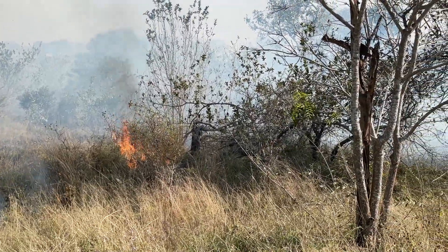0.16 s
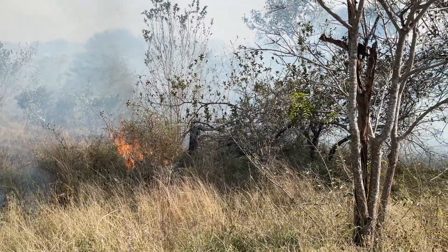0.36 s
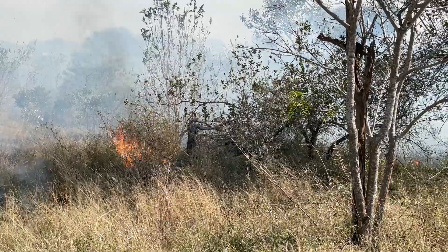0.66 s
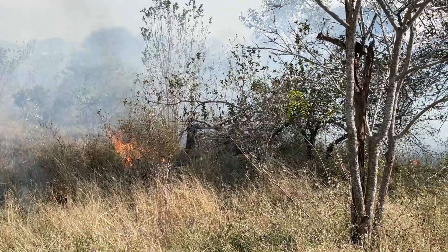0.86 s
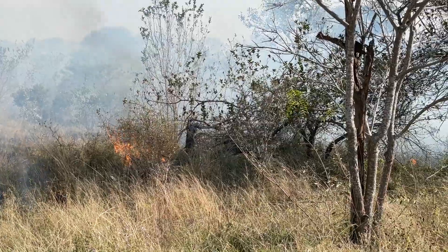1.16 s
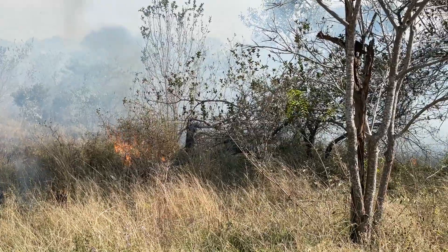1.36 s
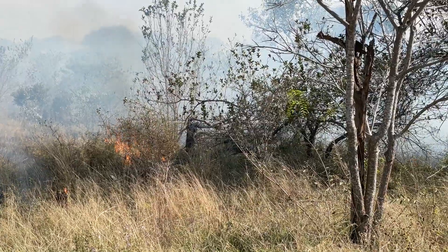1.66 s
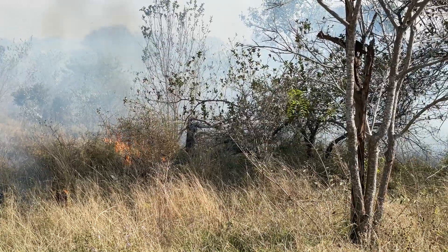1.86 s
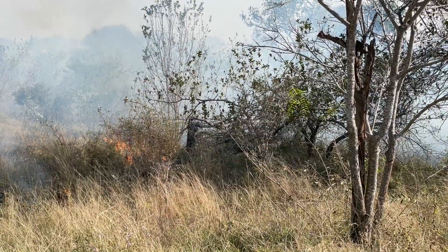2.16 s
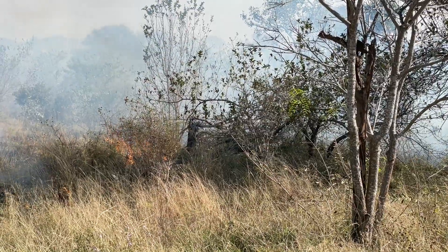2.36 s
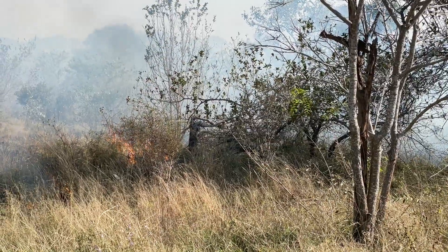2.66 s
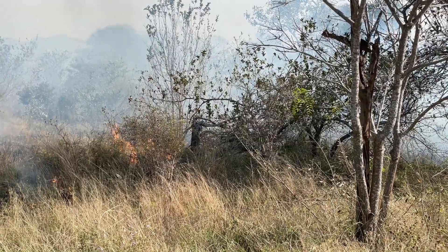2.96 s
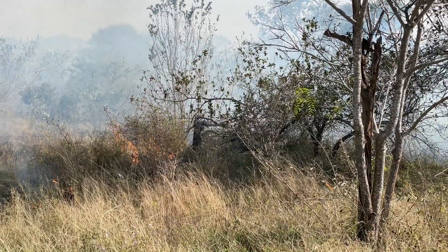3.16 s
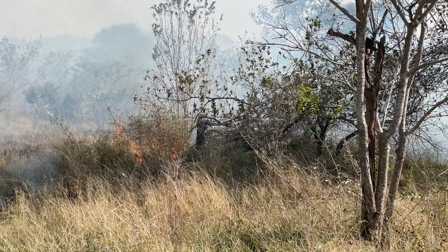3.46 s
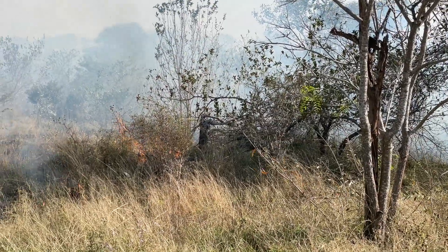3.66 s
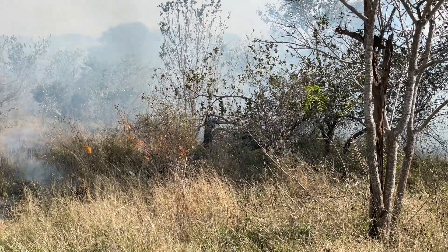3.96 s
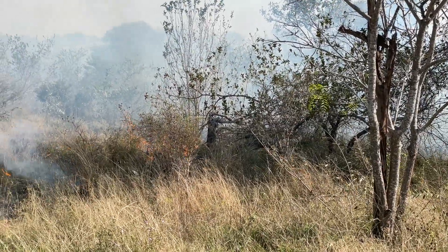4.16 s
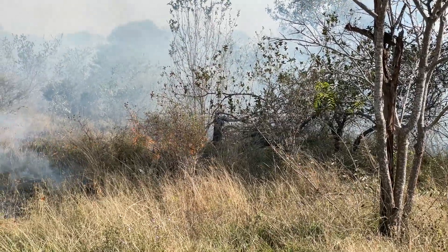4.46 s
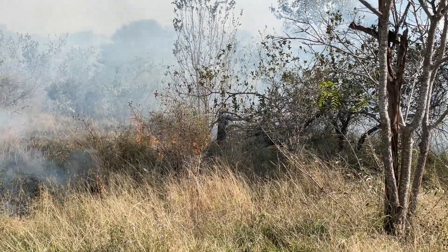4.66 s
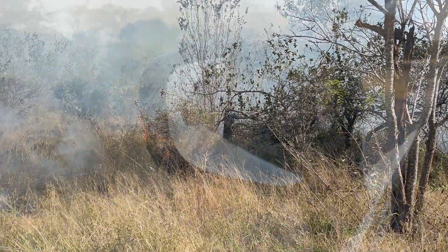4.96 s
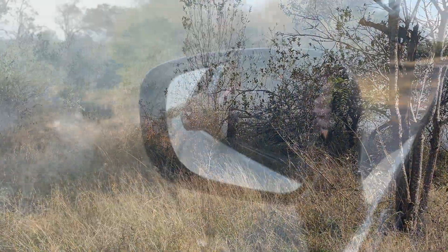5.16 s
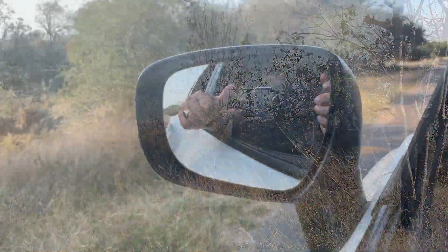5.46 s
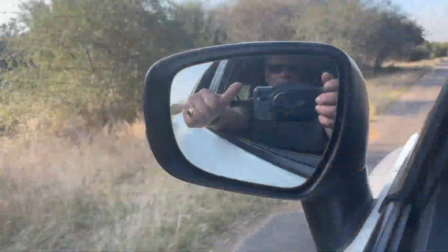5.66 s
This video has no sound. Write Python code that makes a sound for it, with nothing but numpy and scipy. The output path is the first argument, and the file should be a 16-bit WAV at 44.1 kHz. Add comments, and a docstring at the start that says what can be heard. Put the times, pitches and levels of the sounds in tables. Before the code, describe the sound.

A brush fire spits dense crisp pops and fine fizz, one thick limb cracks, then moving-car wind thuds take over as the fire dies away.

```python
"""Dry grass and shrubs burn in the open: from the start, stems snap one by one (shaped noise clicks) over a fizz of
smaller crackles (random trains of such clicks over hiss) and a low roar (filtered noise).
Now and then a pocket of steam bursts with a thump (falling, decaying sine); at 2.6 s a thick limb splits (run of snaps).
From 5.1 s the fire fades and the wind of a moving car buffets the microphone: growing low noise, dull noise puffs
and, last, one click."""
import sys
import numpy as np
from scipy import signal
from scipy.fft import rfft, irfft
from scipy.io import wavfile
from scipy.ndimage import uniform_filter1d

SR = 44100
rng = np.random.default_rng(int(sys.argv[2]) if len(sys.argv) > 2 else 0)


def generate_wav(signal):
    """Clip the signal to [-1, 1] and save it as 16-bit WAV at the path in sys.argv[1]."""
    frames = np.transpose(np.atleast_2d(signal))
    scaled = np.clip(frames, -1, 1) * 32767
    pcm = np.round(scaled).astype(np.int16)
    wavfile.write(sys.argv[1], SR, pcm)


N = 255780

# loudest snapping stems: (time [s], ring level [dB], ring frequency [Hz], knock level [dB], fizz level [dB]);
# each level is the rms if the part's energy filled 1 ms
SNAPS = [(0.0054, -34.5, 4900, -46, -38), (0.0923, -19, 5000, -43, -28.5), (0.1638, -44, 2300, -34, -52),
         (0.3142, -44, 2400, -35.5, -57), (0.3183, -24, 5070, -50, -50), (0.3673, -28, 4900, -35.5, -35),
         (0.3715, -36, 5200, -49, -35), (0.4272, -31.5, 3870, -38.5, -28), (0.476, -37, 3900, -43.5, -48),
         (0.4859, -24, 5460, -38.5, -40), (0.5194, -19, 4860, -43, -41), (0.62, -28.5, 4000, -35, -44),
         (0.6675, -17.5, 4700, -35.5, -18.5), (0.7198, -28, 4500, -46, -33), (0.748, -24, 6200, -51, -31),
         (0.895, -31, 5300, -41.5, -49), (0.9363, -35, 3100, -35.5, -48), (1.007, -20, 4500, -33.5, -24.5),
         (1.0428, -32, 4000, -45, -38), (1.0703, -22, 4950, -36, -31.5), (1.1458, -36, 3400, -33.5, -33.5),
         (1.2045, -32, 5500, -60, -32), (1.2896, -35.5, 6000, -49, -26.5), (1.3678, -21.5, 4160, -41, -36),
         (1.439, -27, 5430, -42, -27), (1.4523, -28, 5500, -36, -42), (1.4573, -36, 3300, -39, -42),
         (1.5287, -32, 6100, -61, -29.5), (1.595, -47, 2300, -31, -50), (1.6445, -32, 3800, -42, -34),
         (1.7124, -29, 4900, -53, -33.5), (1.786, -28, 4000, -40, -47), (1.7988, -34, 5100, -54, -44),
         (1.8165, -31, 6000, -52, -39), (1.8321, -26, 4470, -45, -32), (1.8359, -29, 4300, -35, -46),
         (1.8848, -25.5, 5470, -47, -30.5), (2.0278, -22.5, 6260, -48, -22.5),
         (2.0827, -25, 4600, -48, -32), (2.091, -29, 4300, -40, -44), (2.0974, -27, 3700, -35, -36),
         (2.1758, -21.5, 4660, -42, -24.5), (2.1933, -33, 3000, -39.5, -49), (2.3238, -29, 6270, -39, -28),
         (2.401, -31, 4400, -41, -44), (2.4356, -25, 5500, -46, -31), (2.5683, -41, 2500, -41.5, -48),
         (2.5718, -23, 5370, -45.5, -35), (2.61, -29.5, 3700, -29.5, -40.5), (2.6834, -31, 6200, -58, -34),
         (2.7056, -20.5, 5000, -33.5, -37), (2.7482, -30.5, 5140, -36, -32), (3.17, -34, 5200, -48, -31),
         (3.2409, -34, 4800, -38.5, -39), (3.2836, -29.5, 4800, -40, -33), (3.4055, -29, 4020, -34.5, -32),
         (3.4551, -30.5, 4900, -42, -37), (3.4666, -28.5, 5300, -53, -27.5),
         (3.6127, -21.5, 5800, -43, -27), (3.6271, -20, 4960, -47, -38), (3.6318, -17, 5070, -38, -30.5),
         (3.6428, -22.5, 5800, -53, -20.5), (3.6501, -27.5, 6160, -49, -33),
         (3.6622, -22.5, 6300, -54, -37), (3.8303, -31, 4700, -41, -38), (3.8558, -28.5, 4580, -41, -35),
         (3.9422, -31.5, 4400, -49, -36), (4.0104, -32.5, 5200, -43, -32.5),
         (4.0631, -28.5, 3970, -44, -38), (4.3204, -35, 4000, -47, -40), (4.3249, -22, 4500, -32.5, -31),
         (4.3815, -26.5, 5800, -48, -35), (4.5702, -30, 3580, -37, -33), (4.6236, -31.5, 3700, -43, -39),
         (4.6617, -29, 4500, -37, -42), (4.6705, -32, 5400, -55, -37), (4.7431, -28, 5660, -60, -39),
         (4.9146, -34, 3100, -38.5, -38), (4.9577, -32.5, 5160, -48, -39), (5.075, -29.5, 4050, -38, -39),
         (5.3031, -27, 5560, -40, -32)]
# bursting steam pockets: (time [s], initial envelope [dB])
STEAM_BURSTS = [(0.6678, -27.5), (2.591, -35.5), (3.6132, -48), (3.6327, -44), (3.643, -46), (3.6625, -47),
                (3.8297, -46)]
# eddies that hit the microphone: (time [s], peak of the two-port mean [dB])
EDDIES = [(5.13, -43), (5.163, -39.5), (5.2, -36.5), (5.244, -38.5), (5.297, -32), (5.304, -31),
          (5.373, -29.5), (5.407, -33.5), (5.416, -34.5), (5.483, -35), (5.496, -37), (5.522, -34),
          (5.563, -38), (5.597, -29), (5.607, -27.5), (5.621, -34.5), (5.642, -37.5), (5.732, -35.5),
          (5.763, -24.5)]
# strength of the fire before the end fade: (time [s], level [dB])
BLAZE = [(0.0, -48), (0.42, -47.5), (1.73, -49), (1.89, -48), (2.34, -47.5), (2.83, -45.5), (3.02, -49),
         (3.55, -48), (3.79, -49.5), (4.33, -49.5), (4.55, -48.5), (5.0, -51)]
# filter of a snap's woody knock: (frequency [Hz], relative gain [dB])
KNOCK_FILTER = [(120, -42.5), (400, -4.5), (800, -3), (1300, 3.5), (2000, 3.5), (2700, -0.5), (4500, -24)]
# filter of a snap's ring: (frequency [Hz], relative gain [dB])
RING_FILTER = [(700, -27.5), (1400, -22), (2200, -6.5), (3200, -0.5), (5500, -2), (7300, 0.5), (8100, 0),
               (9000, -14), (11000, -49)]
# filter of a snap's fizz: (frequency [Hz], relative gain [dB])
FIZZ_FILTER = [(7500, -48), (9000, -0.5), (10500, 3.5), (12000, 4), (13800, 2.5), (15000, 2),
               (16000, -13.5)]
# filter of the thin blades: (frequency [Hz], relative gain [dB])
GRASS_FILTER = [(900, -21.5), (1800, -6.5), (2600, -6.5), (3400, -1), (5500, 1.5), (7300, 1), (8100, 0.5),
                (8800, -27), (9700, -3.5), (10600, -1), (13500, -1.5), (15000, -1.5), (16000, -39)]
# filter of the thicker twigs: (frequency [Hz], relative gain [dB])
BRUSH_FILTER = [(150, -17.5), (350, -1), (700, -2), (1000, -4.5), (1400, 0), (2000, -1.5), (3000, 0.5),
                (6000, -24)]
# filter of the flames' roar: (frequency [Hz], relative gain [dB])
ROAR_FILTER = [(12, -46), (22, -28), (40, -5.5), (62, 1.5), (90, -2.5), (150, -4), (230, -7), (330, -16),
               (600, -22.5), (1500, -27), (4000, -62)]
# filter of the wind's rumble: (frequency [Hz], relative gain [dB])
WIND_FILTER = [(12, -34), (25, -8), (50, 2), (80, 1.5), (120, -8.5), (190, -12.5), (350, -23.5),
               (800, -37.5), (2000, -48), (5000, -72)]
# filter of the gust's click: (frequency [Hz], relative gain [dB])
FLICK_FILTER = [(300, -15), (900, -1), (2200, -1), (3500, -3), (5200, -21), (9000, -57)]
# the two microphone ports: (frequency [Hz], phase by which the left leads [rad])
PORT_PHASE = [(20, 0.0), (5200, 0.6), (5800, -1.5), (6600, -0.9), (7100, -1.2), (7600, -2.5), (8800, -3.1),
              (10000, -4.0), (11500, -4.9), (13000, -6.0), (14500, -6.3), (16000, -7.0)]

EDGE_HZ = 16350
SHORT_SIZE, LEAD = 2048, 128  # samples in a short event, and before its onset
SHORT_T_S = np.arange(SHORT_SIZE) / SR
T_S = np.arange(N) / SR

ROAR_DB, WIND_DB, WIND_GROWS_DB_PER_S = -54, -40, 8  # WIND_DB holds at WIND_FULL_S
WIND_FROM_S, WIND_FULL_S = 5.09, 5.21
FADE_FROM_S, FADE_END_S, FADE_POWER = 5.08, 5.752, 2.57
# a harder eddy is quicker than a typical one
EDDY_DB, EDDY_RISE_S, EDDY_EDGE_HZ = -34.5, 0.0027, 847
QUICKER_OCTAVES_PER_DB = 0.07
# lesser stems: the thicker, the lower the ring, the more knock, the less fizz; spreads are standard deviations
STEMS_PER_S, STEM_HZ, STEM_SPREAD_OCTAVES = 30, 4800, 0.37
STEM_OVER_BLAZE_DB, STEM_SPREAD_DB = 11.5, 2.02
KNOCK_OVER_RING_DB, KNOCK_DB_PER_OCTAVE = -13, -17
FIZZ_OVER_RING_DB, FIZZ_DB_PER_OCTAVE = -7.5, 10
BURST_HZ, BURST_HALVING_S, BURST_DECAY_S = 1410, 0.0008, 0.0063


def gain_of(db):
    """Decibels to amplitude."""
    return 10 ** (np.asarray(db) / 20)


def evened(x):
    """Scales to an rms of 1."""
    return x / np.sqrt(np.mean(x ** 2) + 1e-20)


def read(points, hz):
    """Interpolates a table on a log-frequency axis."""
    f, value = np.transpose(points)
    return np.interp(np.log(hz + 1), np.log(f + 1), value)


def add(mix, s, sound):
    """Mixes a sound in at time s."""
    part = mix[:, max(round(s * SR), 0):][:, :sound.shape[-1]]
    part += sound[..., :part.shape[-1]]


def coloured(x, spectrum):
    """Filters a sound by a gain table, then scales it to an rms of 1."""
    size = x.shape[-1]
    gain = gain_of(read(spectrum, np.fft.rfftfreq(size, 1 / SR)))
    return evened(irfft(rfft(x) * gain, size))


def pair(size, apart):
    """Stereo noise: one shared part, and a smaller part of opposite sign at the two ports."""
    shared, side = rng.standard_normal((2, size))
    return np.array([shared + apart * side, shared - apart * side])


def ports(x):
    """Sound reaches the two ports with a phase difference that depends on frequency."""
    half = read(PORT_PHASE, np.fft.rfftfreq(N, 1 / SR)) / 2
    return irfft(rfft(x) * np.exp(1j * np.array([half, -half])), N)


def blaze_db(s):
    """Strength of the fire at time s, with its smooth fade at the end."""
    gone = np.interp(s, [FADE_FROM_S, FADE_END_S], [0, 1])
    fade_db = 20 * FADE_POWER * np.log10(np.cos(gone * np.pi / 2) + 1e-6)
    return np.interp(s, *np.transpose(BLAZE)) + fade_db


def fracture(tear_s, scatter_db, scatter_s, start_s=0.00016, field_db=-37.5, field_s=0.018, apart=0.13,
             ground_db=-11):
    """A split starts, then fibres tear in a fraction of a millisecond; the ground, twigs and field throw it back."""
    t = SHORT_T_S - LEAD / SR
    before, after = np.maximum(-t, 0), np.maximum(t, 0)
    tear = pair(SHORT_SIZE, apart) * np.exp(-before / start_s - after / tear_s)
    ground_delay = round(rng.uniform(0.0003, 0.0011) * SR)
    ground = gain_of(ground_db) * np.roll(tear, ground_delay, axis=1)
    scatter = gain_of(scatter_db) * np.exp(-after / scatter_s)
    field = gain_of(field_db) * np.exp(-after / field_s)
    tail = pair(SHORT_SIZE, 0.44) * (scatter + field) * (t > 0)
    z = rfft(tear + ground + tail)
    # white overall, with its own ripples
    broad = np.sqrt(uniform_filter1d((abs(z) ** 2).mean(0), size=200))
    return irfft(z / broad)


def stem(click, ring_hz, boost_db=7.0, octaves=0.45):
    """A hollow stem favours one broad resonance."""
    hz = np.fft.rfftfreq(SHORT_SIZE, 1 / SR) + 1
    bump_db = boost_db * np.exp(-(np.log2(hz / ring_hz) / octaves) ** 2)
    return irfft(rfft(click) * gain_of(bump_db))


def air():
    """The steady roar of the flames gives way to a growing rumble of wind."""
    windy = np.interp(T_S, [WIND_FROM_S, WIND_FULL_S], [0, 1])
    roar = gain_of(ROAR_DB) * coloured(pair(N, 0.16), ROAR_FILTER)
    wind_db = WIND_DB + WIND_GROWS_DB_PER_S * (T_S - WIND_FULL_S)
    wind = gain_of(wind_db) * coloured(pair(N, 0.19), WIND_FILTER)
    return np.sqrt(1 - windy) * roar + windy * wind


def eddies(lee_db=-6, lee_hz=380, steepness=3.37, low_cut_hz=150):
    """Each eddy is a short dull puff; its bass is alike at both ports, its top differs and is weaker in the lee."""
    out = np.zeros((2, N))
    hz = np.fft.rfftfreq(SHORT_SIZE, 1 / SR) + 1
    top = 1 / (1 + (lee_hz / hz) ** 6)
    high_cut = 1 + (hz / EDDY_EDGE_HZ) ** steepness
    low_cut = 1 + (low_cut_hz / hz) ** 2
    for s, db in EDDIES:
        rise_s = EDDY_RISE_S / 2 ** (QUICKER_OCTAVES_PER_DB * (db - EDDY_DB))
        swell = pair(SHORT_SIZE, 0.4) * SHORT_T_S * np.exp(-SHORT_T_S / rise_s)
        swirl = rfft(np.roll(swell, LEAD, axis=1))
        swirl = (1 - top) * swirl.mean(0) + top * swirl * gain_of([[0], [lee_db]])  # right port in the lee
        puff = irfft(swirl / high_cut / low_cut)
        add(out, s - LEAD / SR, gain_of(db) * puff / abs(puff.mean(0)).max())
    return out


def flick(at_s=5.7655, peak_db=-34.5):
    """One gust strikes hard enough to click."""
    out = np.zeros((2, N))
    burst = fracture(tear_s=0.00024, scatter_db=-13, scatter_s=0.00089, field_db=-57)
    click = coloured(burst, FLICK_FILTER)
    add(out, at_s - LEAD / SR, gain_of(peak_db) * click / abs(click).max())
    return out


def crackle(grains, per_s, spread_db, most_db, clump_db, clump_s):
    """Many small fractures, mostly faint, in clumps as one tuft after another catches."""
    knots_s = np.arange(0, N / SR + clump_s, clump_s)
    clumps = gain_of(clump_db * np.interp(T_S, knots_s, rng.standard_normal(len(knots_s))))
    sizes_db = np.minimum(spread_db * rng.exponential(1, N), most_db)
    sizes = gain_of(sizes_db) * rng.choice([-1, 1], N)
    train = sizes * (rng.random(N) < per_s / SR * clumps / clumps.mean())
    which = rng.integers(0, len(grains), N)
    out = np.zeros((2, N))
    for k, grain in enumerate(grains):
        out += signal.oaconvolve((train * (which == k))[None], grain, axes=1)[:, :N]
    return evened(out)


def brush(level_db=-9.0, wash_db=-5):
    """Thicker twigs farther off crackle with a dull, smeared sound; level_db is relative to the blaze."""
    grains = []
    for hz in np.geomspace(800, 3000, num=12):
        click = fracture(tear_s=0.0002, scatter_db=-8, scatter_s=0.0023, apart=0.11)
        grains.append(stem(click, hz, boost_db=6.5))
    ticks = crackle(grains, per_s=450, spread_db=4.5, most_db=12.0, clump_db=4, clump_s=0.02)
    wash = gain_of(wash_db) * pair(N, 0.15)
    return gain_of(blaze_db(T_S) + level_db) * coloured(ticks + wash, BRUSH_FILTER)


def grass(level_db=0.25, hiss_db=-9):
    """Thin blades crackle brightly over the hiss of countless more; level_db is relative to the blaze."""
    grains = []
    for hz in np.geomspace(2500, 14000, num=24):
        click = fracture(tear_s=0.00018, scatter_db=-20, scatter_s=0.0015)
        grains.append(stem(click, hz))
    ticks = crackle(grains, per_s=1500, spread_db=3.0, most_db=12, clump_db=3, clump_s=0.017)
    hiss = gain_of(hiss_db) * pair(N, 0.059)
    return gain_of(blaze_db(T_S) + level_db) * coloured(ticks + hiss, GRASS_FILTER)


def bursts():
    """Steam escapes with a push whose pitch drops as the split widens."""
    out = np.zeros((2, N))
    turns = BURST_HZ * BURST_HALVING_S * np.log1p(SHORT_T_S / BURST_HALVING_S)
    push = np.sin(2 * np.pi * turns) * np.exp(-SHORT_T_S / BURST_DECAY_S)
    for s, db in STEAM_BURSTS:
        add(out, s, gain_of(db) * push)
    return out


def snap(ring_db, ring_hz, knock_db, fizz_db):
    """A breaking stem gives a knock, a short ring and a fizz."""
    one_ms = np.sqrt(SR / 1000 / SHORT_SIZE)  # from rms over the whole event to rms over 1 ms
    click = fracture(tear_s=0.0002, scatter_db=-19.5, scatter_s=0.0017)
    thud = fracture(tear_s=0.00033, scatter_db=-24.5, scatter_s=0.0082, apart=0.051)
    ring = gain_of(ring_db) * coloured(stem(click, ring_hz, boost_db=6.5), RING_FILTER)
    fizz = gain_of(fizz_db) * coloured(click, FIZZ_FILTER)
    knock = gain_of(knock_db) * coloured(thud, KNOCK_FILTER)
    return one_ms * (ring + fizz + knock)


def lesser_snaps(count=220):
    """Stems of random thickness break all the while, as loud as the fire is strong."""
    out = np.zeros((2, N))
    draws = rng.uniform(-1, 1, (count, 5)) * np.sqrt(3)  # unit variance
    for k, (when, loud, thin, woody, fizzy) in enumerate(draws):
        s = abs(k + when) / STEMS_PER_S
        octaves = STEM_SPREAD_OCTAVES * thin
        ring_db = blaze_db(s) + STEM_OVER_BLAZE_DB + STEM_SPREAD_DB * loud
        knock_db = ring_db + KNOCK_OVER_RING_DB + KNOCK_DB_PER_OCTAVE * octaves + STEM_SPREAD_DB * woody
        fizz_db = ring_db + FIZZ_OVER_RING_DB + FIZZ_DB_PER_OCTAVE * octaves + STEM_SPREAD_DB * fizzy
        add(out, s, snap(ring_db, STEM_HZ * 2 ** octaves, knock_db, fizz_db))
    return out


def limb(at_s=2.5911, step_s=0.0008, weaker_db=-2.5, count=6, push_db=-15, push_hz=1400, push_s=0.0009):
    """A thick limb gives way in a quick run of weakening snaps, with one short push of steam."""
    out = np.zeros((2, N))
    for k in range(count):
        crack = snap(ring_db=-21, ring_hz=2000, knock_db=-27, fizz_db=-20)
        add(out, at_s + k * step_s - LEAD / SR, gain_of(k * weaker_db) * crack)
    push = np.sin(2 * np.pi * push_hz * SHORT_T_S) * np.exp(-SHORT_T_S / push_s)
    add(out, at_s, gain_of(push_db) * push)
    return out


def snaps():
    """The near stems break one by one."""
    out = np.zeros((2, N))
    for s, *voice in SNAPS:
        add(out, s - LEAD / SR, snap(*voice))
    return out


def scene():
    """The fire as the two ports hear it, with steam bursts, low air noise and buffeting."""
    fire = brush() + grass() + lesser_snaps() + limb() + snaps()
    return air() + eddies() + flick() + bursts() + ports(fire)


def record(dry):
    """The recorder's band limit: a linear-phase lowpass."""
    lowpass = signal.firwin(255, EDGE_HZ, window=("kaiser", 9), fs=SR)
    return signal.oaconvolve(dry, lowpass[None], "same")


dry = scene()
out = record(dry)
generate_wav(out)
```